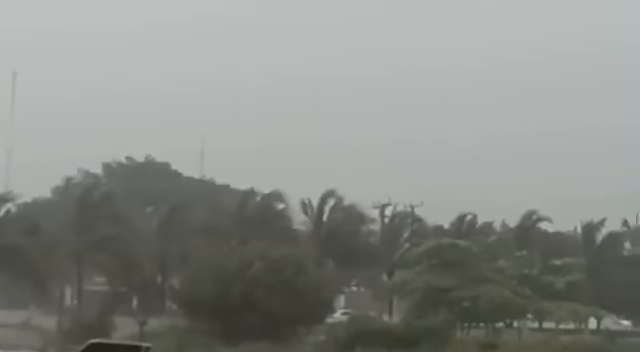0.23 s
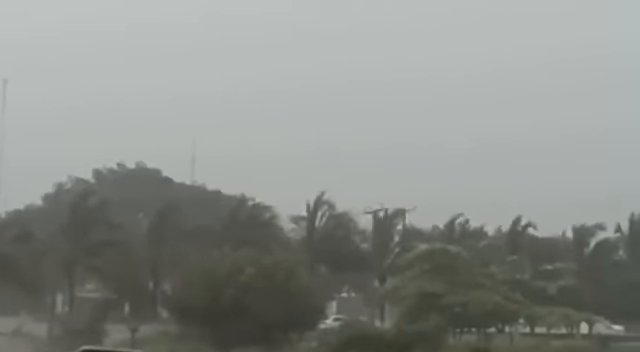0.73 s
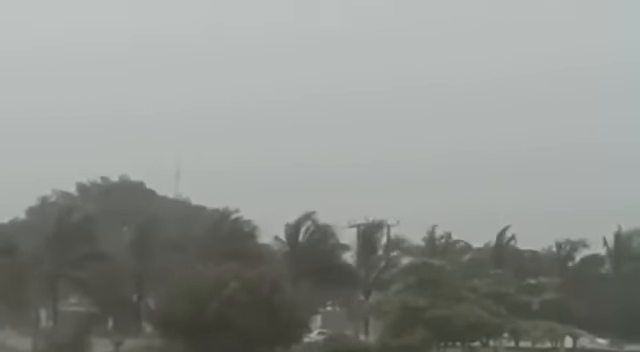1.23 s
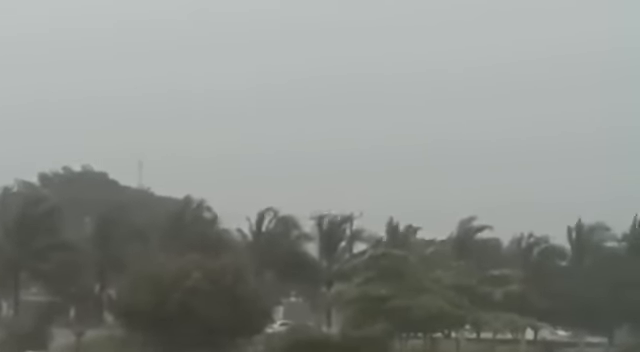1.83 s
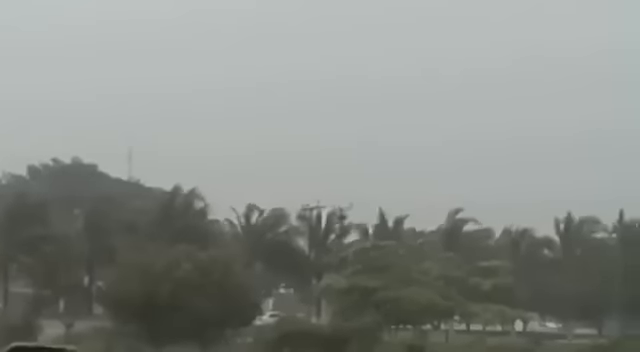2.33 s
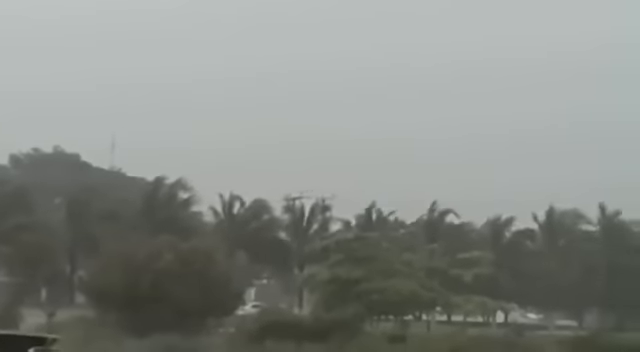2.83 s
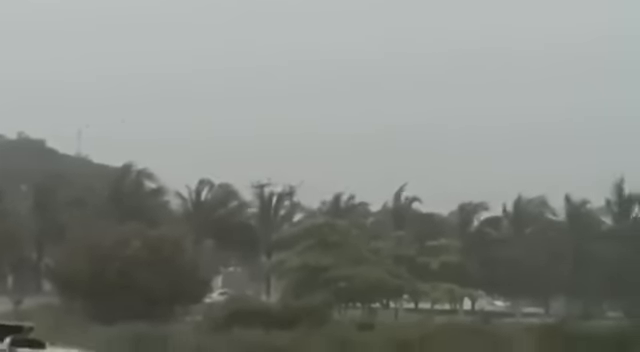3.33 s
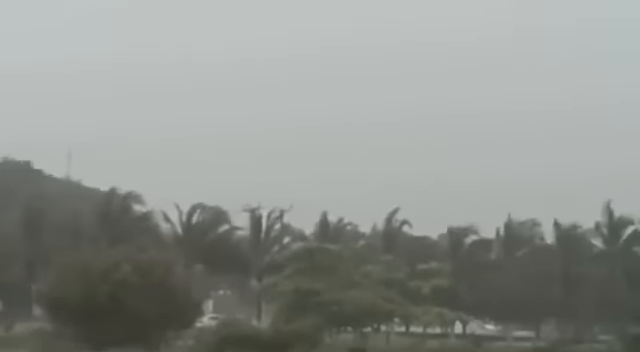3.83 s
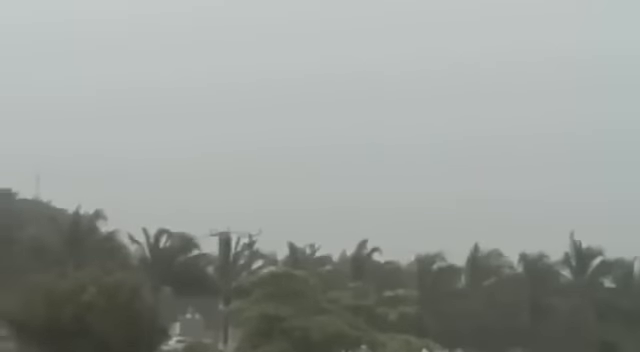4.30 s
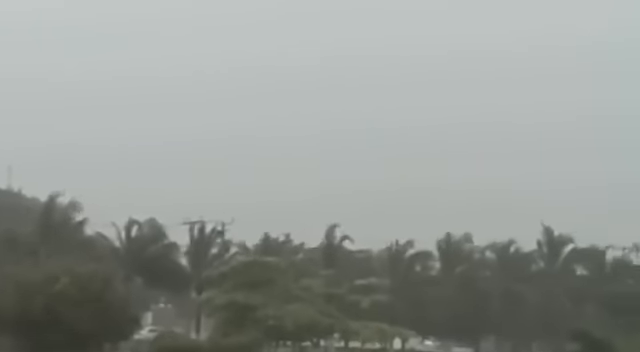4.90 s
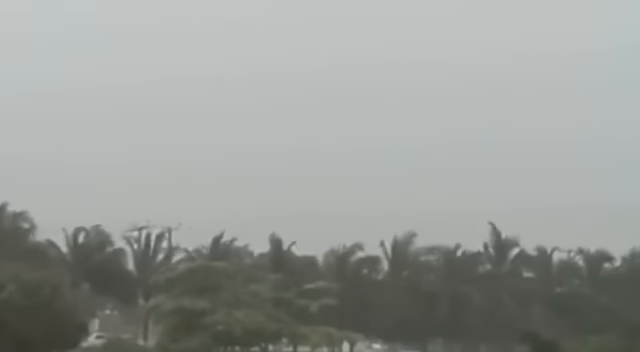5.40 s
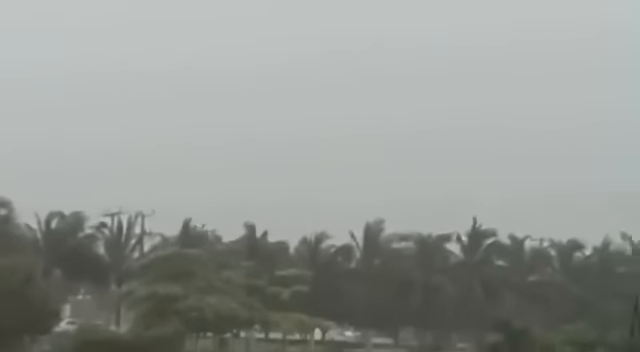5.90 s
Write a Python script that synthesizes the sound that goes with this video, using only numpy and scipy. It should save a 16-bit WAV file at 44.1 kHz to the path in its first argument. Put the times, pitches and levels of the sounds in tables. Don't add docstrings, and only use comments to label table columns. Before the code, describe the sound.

Storm wind rumbles and thumps against an exposed microphone in heavy gusts while dense rain hisses and roars steadily over trees.

```python
import sys
import numpy as np
from scipy import signal
from scipy.fft import rfft, irfft, next_fast_len
from scipy.io import wavfile
from scipy.ndimage import uniform_filter1d

SR = 44100
rng = np.random.default_rng(int(sys.argv[2]) if len(sys.argv) > 2 else 0)


def voltage_ratio(decibels):
    exponent = np.asarray(decibels, float) / 20
    return 10 ** exponent


def bounce(signal):
    frames = np.transpose(np.atleast_2d(signal))
    limited = np.clip(frames, -1, 1)
    pcm = np.round(limited * 32767).astype(np.int16)
    wavfile.write(sys.argv[1], SR, pcm)


N = 271215

# (time [s], density [dB])
RAIN_SHEETS = [(0.0, -28), (0.3, -25.5), (0.6, -24.5), (0.85, -28.5), (1.3, -25.5), (2.0, -27.5),
               (2.5, -27), (3.0, -28.5), (3.4, -27), (3.9, -25), (4.4, -25.5), (4.9, -24.4), (5.2, -23.5),
               (5.45, -25.5), (5.7, -28), (6.15, -25)]
# (time [s], change [dB])
RAIN_FLURRIES = [(0.075, -1.5), (1.038, 0.9), (1.127, 1), (1.347, 0.5), (1.427, -0.5), (1.636, 0),
                 (1.831, 2.5), (2.0, 1.0), (2.07, 1), (2.664, 1.5), (2.824, 0.4), (2.903, 0), (3.307, 0.5),
                 (3.512, 0.8), (3.891, 2.5), (4.001, 1.6), (4.126, 0.5), (4.2, 1), (4.335, 1.5), (4.54, 0),
                 (4.734, 0.7), (4.879, 1), (5.153, -2), (5.408, -1.5), (5.657, 0.5), (5.887, 1.5)]
# (frequency [Hz], level [dB per Hz])
PORT_LEFT = [(400, -5.5), (650, -4), (1100, 1.3), (1350, -0.5), (2000, 3), (2450, -5.5), (3400, -3.5),
             (3800, -6), (5400, -4), (6500, -9), (7600, -21.5), (9000, -23), (12000, -30), (14300, -38)]
PORT_RIGHT = [(400, -2), (650, -1), (1150, 2.3), (1400, -1.5), (2000, 3), (2500, -6), (3400, -6.5),
              (3800, -10.5), (4300, -8), (5000, -11.5), (7000, -10), (9500, -4.5), (11500, -11),
              (14200, -19.5)]
# (frequency [Hz], likeness [0-1])
RAIN_LIKENESS = [(400, 0), (800, .2), (1100, .12), (1500, 0)]
# (time [s], strength [dB], turbulence [dB])
BREEZE = [(0.0, -26.5, -27.8), (0.3, -26, -26.5), (0.9, -17.8, -26), (1.05, -21.5, -28.0),
          (1.5, -25.3, -24.5), (1.8, -18.5, -26.5), (2.2, -26.5, -26), (2.5, -27.5, -29),
          (2.9, -25.5, -25.5), (3.1, -22, -27.5), (3.5, -19.5, -35.0), (4.1, -20, -24.5), (4.6, -19.5, -22),
          (5.05, -24.5, -24.5), (5.4, -23.6, -26.5), (5.65, -22, -27), (5.95, -35.5, -34),
          (6.15, -25.8, -28.5)]
# (time [s], change [dB])
SURGES = [(0.454, 4.5), (0.898, -3.3), (1.033, -6.3), (1.187, -4), (1.307, 3), (1.556, 7), (1.791, -6.8),
          (1.971, -3.5), (2.07, 2.5), (2.405, -3.2), (2.84, 4.0), (3.023, -5), (3.248, 4), (3.337, 0),
          (3.422, -3), (3.585, 4.5), (3.746, -2.5), (3.866, 3.0), (4.08, 3.0), (4.455, 6.5), (4.535, -3),
          (4.954, 8), (5.378, 6.2), (5.562, 5.5), (5.652, -9.5), (5.812, -6.5)]
# (start [s], length [s], strength [dB], relative speed [1])
GUSTS_LEFT = [(0, 0.068, -23.0, 0.9), (0.364, 0.035, -19.1, 1.24), (0.472, 0.12, -27, 1.08),
              (0.695, 0.056, -17.5, 1.18), (0.787, 0.098, -27.5, 1.01), (0.923, 0.014, -16.5, 1.17),
              (1.139, 0.015, -20.5, 0.95), (1.248, 0.12, -12.5, 1.07), (1.403, 0.061, -9, 1.2),
              (1.57, 0.061, -14.5, 1.03), (1.786, 0.015, -17.5, 0.92), (1.97, 0.015, -15.5, 0.82),
              (2.839, 0.015, -21, 0.53), (3.167, 0.016, -4.0, 1.23), (3.221, 0.159, -10, 0.97),
              (3.402, 0.066, -15, 1.0), (3.524, 0.089, -17.5, 1.12), (3.657, 0.2, -8, 1.12),
              (3.919, 0.098, -14.5, 1.07), (4.062, 0.043, -15.5, 1.25), (4.216, 0.095, -10, 1.12),
              (4.409, 0.069, -9, 1.12), (4.605, 0.12, -26, 1.07), (4.823, 0.063, -16.5, 0.89),
              (4.933, 0.062, -15, 0.95), (5.173, 0.022, -15, 0.97), (5.379, 0.016, -16, 1.03),
              (5.447, 0.015, -11, 0.9), (5.5, 0.1, -19.9, 1.08), (6.095, 0.017, -15.6, 0.74)]
GUSTS_RIGHT = [(0.2, 0.11, -26.5, 1.0), (0.403, 0.015, -17.5, 1.1), (0.468, 0.015, -18.5, 1.14),
               (0.683, 0.015, -13.5, 1.17), (0.741, 0.12, -19, 1.21), (0.926, 0.015, -15, 1.13),
               (1.084, 0.054, -19.0, 1.12), (1.254, 0.015, -17.5, 1.08), (1.343, 0.17, -24.0, 0.88),
               (1.683, 0.015, -16, 1.1), (1.864, 0.073, -18.0, 0.77), (2.07, 0.014, -16.5, 0.9),
               (2.451, 0.015, -18, 1.14), (2.998, 0.078, -24, 1.14), (3.228, 0.24, -23.5, 0.83),
               (3.51, 0.018, -9.5, 1.06), (3.569, 0.19, -20.0, 1.045), (3.774, 0.084, -19.5, 0.98),
               (3.912, 0.089, -21.5, 1.09), (4.09, 0.015, -24.5, 1.01), (4.155, 0.01463, -18, 1.03),
               (4.338, 0.019, -17.5, 0.93), (4.564, 0.045, -18, 0.98), (4.637, 0.11, -19, 1.2),
               (4.831, 0.047, -18.5, 1.17), (5.176, 0.015, -14.5, 0.93), (5.388, 0.015, -19.5, 1.23),
               (5.519, 0.08, -20, 1.03), (5.578, 0.076, -25, 1.01), (6.115, 0.015, -19, 1.27)]
# (time [s], peak [dB], frequency [Hz])
SLAPS_LEFT = [(0.735, -3, 308), (1.3, -1, 283.3), (1.405, -2, 520), (1.415, 0, 518.5), (1.427, -3, 279),
              (1.438, 7.5, 328), (1.452, -5, 520), (1.583, 0, 270.2), (3.172, 5, 230.3), (3.187, 4, 301.1),
              (3.224, 1, 800), (3.284, -1, 600), (3.299, 0, 496.7), (3.312, 0, 518.4), (3.356, 7, 516),
              (3.661, -2, 701.4), (3.696, 9, 310.2), (3.743, 6, 799), (3.75, 7, 950), (3.756, 10, 890),
              (3.763, 8.5, 520), (3.798, -1, 520), (3.853, -1, 514.7), (3.958, 4, 516), (4.288, 13, 342.3),
              (4.407, -1, 395), (4.432, 1, 286.9), (4.451, 5, 369.3), (4.696, -4.5, 266.7),
              (5.581, -2.5, 403.5)]
SLAPS_RIGHT = [(0.412, -3, 285), (0.696, -1.5, 411), (0.823, -5, 274), (1.136, -6, 272), (1.55, -3, 40.05),
               (2.455, -8.6, 300.1), (3.519, 0, 227.6), (3.638, -4, 283), (3.792, -9, 519.8),
               (4.654, -1.5, 458.6), (5.398, -7, 277.4)]
# (frequency [Hz], level [dB per Hz])
RUMBLE_SPECTRUM = [(8, 0.5), (20, 2), (45, 2.5), (90, -1.5), (140, -10), (300, -36), (3000, -98)]
# (frequency [Hz], level [dB per Hz])
EDDY_SPECTRUM = [(30, -16), (80, -3), (130, -0.5), (190, -3), (300, -8.5), (500, -19), (1000, -23.5),
                 (2000, -47), (6000, -99)]
# (share [1], delay [ms], low-pass [Hz])
BASS_BLEND = [
    (.69, .555, 254),
    (.88, .535, 316),
]


def evened(x):
    return x / np.sqrt(np.mean(x ** 2, -1, keepdims=True) + 1e-20)


def read(points, hz):
    f, value = np.transpose(points)
    return np.interp(np.log(hz + 1), np.log(f + 1), value)


def curves(rows, t):
    s, *columns = np.transpose(rows)
    return np.array([np.interp(t, s, column) for column in columns])


def bumps(events, width_s, t):
    s, db = np.transpose(events)[:, :, None]
    return (db * np.exp(-.5 * ((t - s) / width_s) ** 2)).sum(0)


def twice_smoothed(x, size):
    return uniform_filter1d(uniform_filter1d(x, size), size)


def smooth_chance(size, span):
    return evened(twice_smoothed(rng.standard_normal(size), span))


def coloured(x, points):
    gain = voltage_ratio(read(points, np.fft.rfftfreq(x.shape[-1], 1 / SR)))
    return evened(irfft(rfft(x) * gain, x.shape[-1]))


def steadied(x, seconds, share):
    power = twice_smoothed(x ** 2, round(seconds * SR))
    return evened(x / (power + .02) ** (np.clip(share, 0, 1) / 2))


def raindrops():
    far, common = rng.standard_normal((2, N)), rng.standard_normal(N)
    sizes = voltage_ratio(4.1 * np.minimum(rng.exponential(1, (2, N)), 5))
    sizes *= rng.choice([-1., 1.], (2, N))
    near_drops_per_s = 3000
    near = evened(sizes * (rng.random((2, N)) < near_drops_per_s / SR))
    hz, t, z = signal.stft(np.vstack([far + voltage_ratio(-9) * near, common]), SR, nperseg=512, noverlap=384)
    alike = np.clip(read(RAIN_LIKENESS, hz), 0, 1)[:, None]
    return hz, t, np.sqrt(1 - alike) * z[:2] + np.sqrt(alike) * z[2]


def rain():
    roar_level_db, hiss_level_db, mean_sheet_db = -26.5, -26, -26
    roar_follows, roar_fade_db_per_s = 0.66, 0.2
    flurry_db, flurry_s = 0.34, 0.027
    hz, t, z = raindrops()
    density_db = curves(RAIN_SHEETS, t)[0] - mean_sheet_db + bumps(RAIN_FLURRIES, flurry_s, t)
    steps = max(round(flurry_s * SR / 128), 1)
    roar_db = roar_level_db - roar_fade_db_per_s * t + roar_follows * density_db
    roar_db += flurry_db * smooth_chance(len(t), steps)
    shared_db = hiss_level_db + density_db + flurry_db * smooth_chance(len(t), steps)
    hiss_db = [shared_db + 0.27 * smooth_chance(len(t), steps) for capsule in "LR"]
    high = np.clip((hz[:, None] - 1800) / 1500, 0, 1)
    patches = rng.standard_normal((len(t), len(hz), 2)).T
    patches = uniform_filter1d(uniform_filter1d(patches, 8, 1), 24, 2)
    flicker = evened(uniform_filter1d(rng.standard_normal(len(t)), size=8))
    for k, (port, port_db) in enumerate(((PORT_LEFT, 37.5), (PORT_RIGHT, 37.))):
        sheet_db = (1 - high) * roar_db + high * hiss_db[k]
        colour_db = read([(60, -13)] + list(port) + [(16000, -64)], hz)[:, None]
        texture_db = 0.63 * patches[k] / patches.std() + 0.44 * high * flicker
        z[k] *= voltage_ratio(port_db - 25 + colour_db + sheet_db + texture_db)
    return signal.istft(z, SR, nperseg=512, noverlap=384)[1][:, :N]


def airflow(gusts):
    gust_rise_s, gust_fall_s = .005, .009
    calm_speed = .85
    rumble_db, gust_rumble_db, rumble_spread_s = -2.5, -16, .04
    surge_s = 0.038
    t = np.arange(0, N + 64, 64) / SR
    breeze_db, calm_db = curves(BREEZE, t)
    start, length, db, speed = np.transpose(gusts)[:, :, None]
    rise = 1 + np.exp((start - t) / gust_rise_s)
    fall = 1 + np.exp(np.minimum((t - start - length) / gust_fall_s, 50))
    power = voltage_ratio(2 * db) / rise / fall
    calm = voltage_ratio(2 * calm_db)
    buffet = calm + power.sum(0)
    smeared = uniform_filter1d(power.sum(0), max(round(rumble_spread_s * SR / 64), 1))
    rumble = voltage_ratio(2 * (breeze_db + rumble_db + bumps(SURGES, surge_s, t)))
    rumble += voltage_ratio(2 * gust_rumble_db) * smeared
    mean_speed = (calm * calm_speed + (power * speed).sum(0)) / buffet
    flow = [10 * np.log10(rumble), 10 * np.log10(buffet), mean_speed]
    return [np.interp(np.arange(N) / SR, t, row) for row in flow]


def patter(buffet_db):
    rate_per_s, level_db, spread_db, low_hz, high_hz = 45, 2, 4, 247, 553
    luck = rng.random((600, 3))
    s = .02 + np.cumsum(.4 + 1.2 * luck[:, 0]) / rate_per_s
    keep = s < N / SR - .02
    s, luck = s[keep], luck[keep]
    db = buffet_db[(s * SR).astype(int)] + level_db - spread_db * np.log(luck[:, 1] + 0.014)
    hz = low_hz * (high_hz / low_hz) ** luck[:, 2]
    return list(zip(s, np.minimum(db, -3), hz))


def add_slaps(out, slaps):
    for (s, db, hz), luck in zip(slaps, rng.random((700, 2))):
        cycles = np.arange(-600, 600) * hz / SR
        at = round(s * SR) - 600
        swing = np.cos(2 * np.pi * (1.12 * cycles + 0.12 * (luck[1] - .5)))
        pop = swing * np.exp(-abs(cycles) / 0.31)
        out[at:at + 1200] += np.sign(luck[0] - .6) * voltage_ratio(db - 2) * pop


def wind(gusts, slaps):
    rumble_db, buffet_db, speed = airflow(gusts)
    rumble = steadied(coloured(rng.standard_normal(N), RUMBLE_SPECTRUM), 0.14, 0.6)
    eddies = coloured(rng.standard_normal(2 * N), EDDY_SPECTRUM)
    travel = np.cumsum(np.clip(speed, .3, 1.9))
    buffet = steadied(np.interp(travel, np.arange(2 * N), eddies), 0.032, 0.67)
    lumps_db = 2.5 * smooth_chance(N, span=500)
    lumps_db *= np.clip((-0.5 - buffet_db) / 12, .3, 1)
    out = voltage_ratio(rumble_db + 0.5 + 1.15 * lumps_db) * rumble
    out += voltage_ratio(buffet_db - 1.5 + lumps_db) * buffet
    add_slaps(out, list(slaps) + patter(buffet_db))
    return out


def scene():
    gales = np.array([wind(GUSTS_LEFT, SLAPS_LEFT), wind(GUSTS_RIGHT, SLAPS_RIGHT)])
    return gales + rain()


def softened(x, roof, knee):
    return x / (1 + abs(x / roof) ** knee) ** (1 / knee)


def blended(x):
    size = next_fast_len(N + 4096)
    hz = np.fft.rfftfreq(size, 1 / SR)
    share, delay_ms, cut_hz = np.transpose(BASS_BLEND)[:, :, None]
    across = share * np.exp(-2j * np.pi * hz * delay_ms / 1000) / (1 + 1j * hz / cut_hz)
    return x + irfft(rfft(x[::-1], size) * across, size)[:, :N]


def top_cut(x):
    return signal.sosfilt(signal.butter(12, 14300, fs=SR, output="sos"), x)


def record(dry):
    capsules = softened(dry, 1.0, 5.6)
    mix = softened(blended(capsules), .97, 6)
    return top_cut(mix)


dry = scene()
out = record(dry)
bounce(out)
```